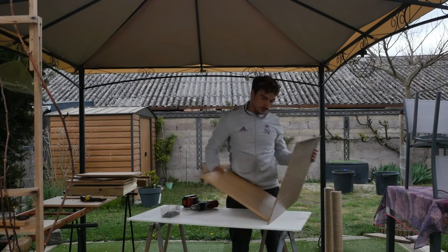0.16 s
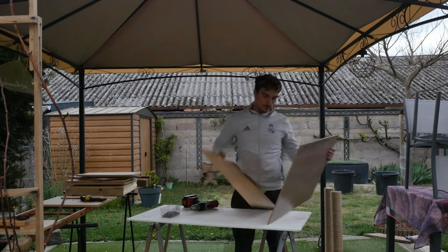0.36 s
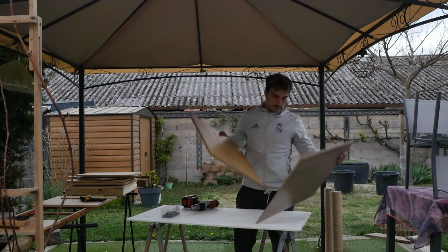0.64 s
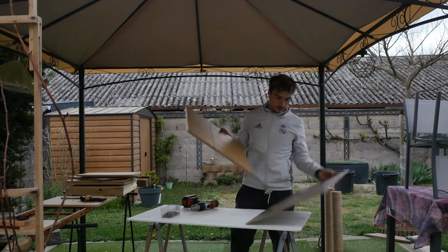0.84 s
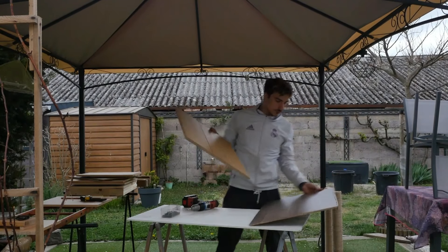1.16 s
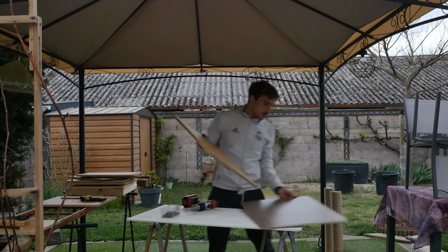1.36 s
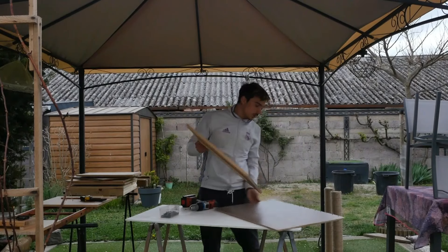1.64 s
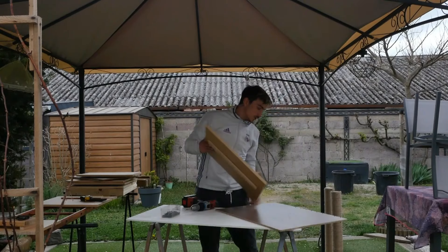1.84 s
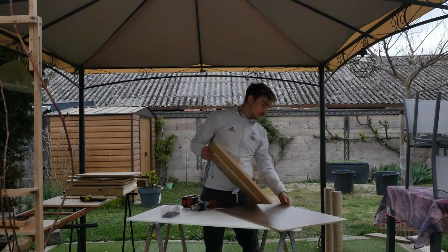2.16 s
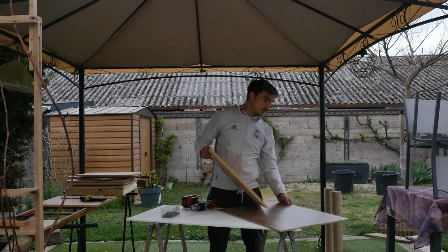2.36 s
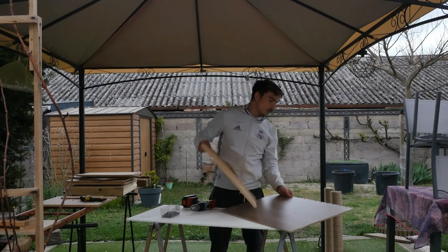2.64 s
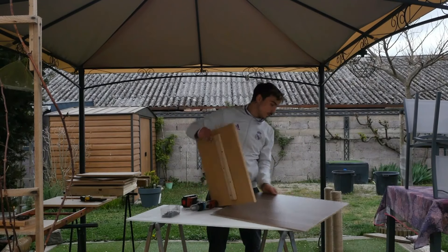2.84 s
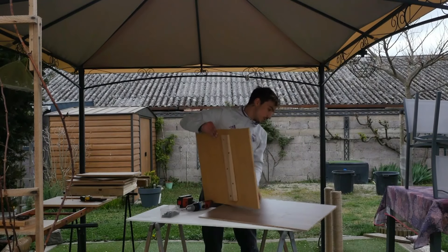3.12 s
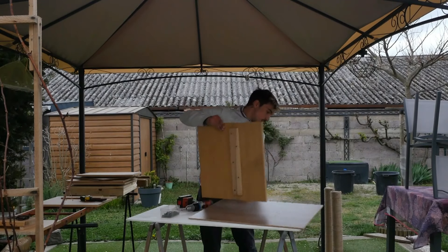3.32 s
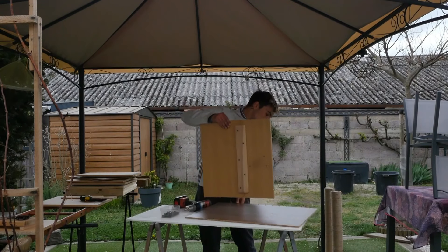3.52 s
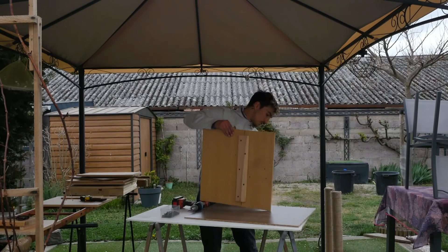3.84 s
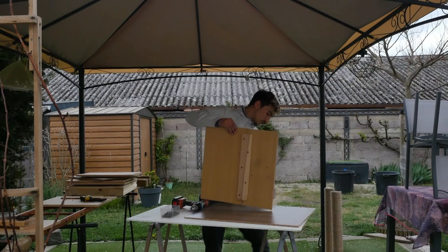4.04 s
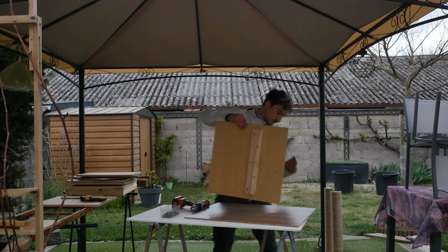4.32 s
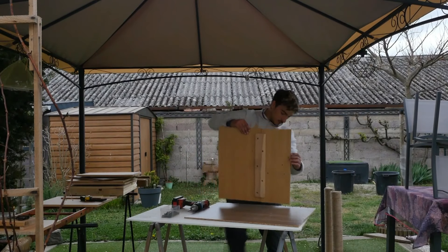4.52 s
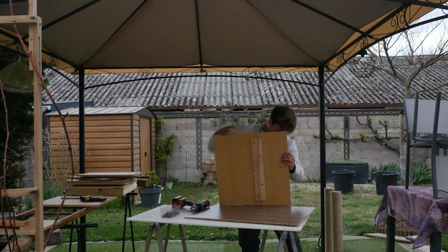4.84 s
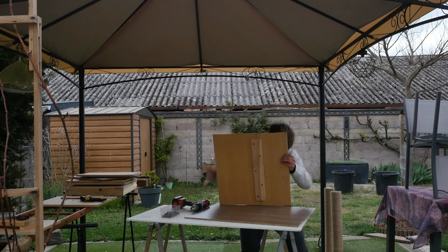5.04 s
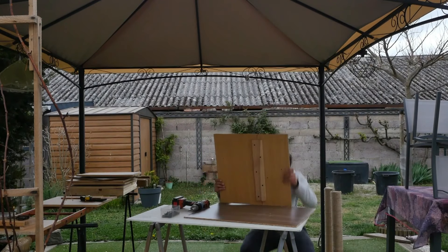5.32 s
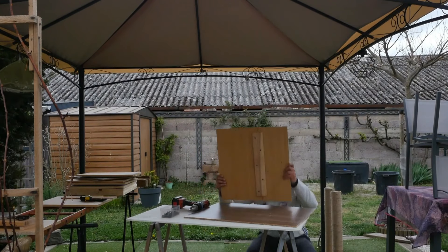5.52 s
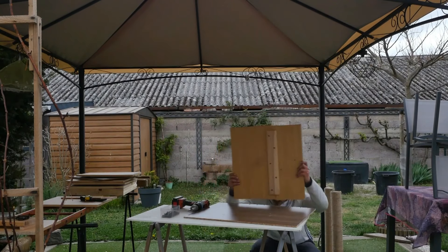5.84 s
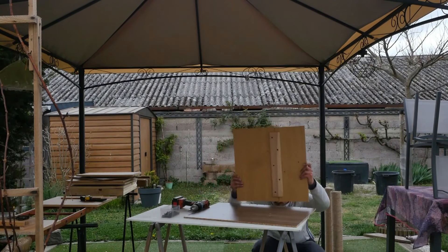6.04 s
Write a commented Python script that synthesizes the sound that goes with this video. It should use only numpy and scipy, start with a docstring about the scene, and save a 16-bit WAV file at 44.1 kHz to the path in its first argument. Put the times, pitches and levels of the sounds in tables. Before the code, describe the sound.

Dry snaps and coarse creaks open, followed by a woody rub and a brief lull. Rapid knocks and sliding follow, then light dragging, a rough scrape and a strong thud. Looser knocks and soft sleeve rustles trail off to a final ringing tick. Open yard with a thin echo, low gusts on the microphone, distant traffic and a barely audible bird.

```python
"""Wooden panels on a trestle table

Two wooden panels are pulled apart and handled on a table under a garden canopy: blows, cracks, strokes, sleeves.
Blows excite ringing wood modes, cracks are short filtered snaps, and friction is a stream of tiny slips.
Levelled low noise makes the wind on the microphone, steady noise the far traffic, gliding sines a faint bird."""
import sys
import numpy as np
from scipy import signal
from scipy.fft import rfft, irfft, next_fast_len
from scipy.io import wavfile
from scipy.ndimage import uniform_filter1d

SR = 44100
rng = np.random.default_rng(int(sys.argv[2]) if len(sys.argv) > 2 else 0)


def inscribe(sig):
    """Save sig as 16-bit PCM at rate SR to the path in sys.argv[1].

    A 1-D sig is mono; a 2-D sig holds one channel per row.
    Samples are clipped to [-1, 1] before scaling.
    """
    pcm = np.round(np.clip(np.atleast_2d(sig).T, -1, 1) * 32767)
    wavfile.write(sys.argv[1], SR, pcm.astype(np.int16))


N = 272538

# where body meets hard edge, and edge meets splinter fizz, in blows and strokes: [Hz]
BAND_EDGES_HZ = [1300, 7000]

# tone of a blow: (frequency [Hz], relative gain [dB])
KNOCK_COLOUR = [(100, -1), (180, 7.5), (270, 8.5), (500, 0.5), (820, 1), (1100, -5), (1400, -9.5),
                (2400, -13), (3500, -10.5), (4200, -18.5), (5500, -17), (7000, -39), (10000, -47.5),
                (16000, -47)]


def knock(body_db, hard_db, splinter_db, first, clatter_s, lowest_hz, contact_hz=2200, size=12000):
    """One blunt push, then the rest of the edge chatters down and the panel rings."""
    t = np.arange(size) / SR
    first = np.clip(first, 0, 1)
    age = t / max(clatter_s, .001)
    # the wood yields, so the push holds little treble
    push = tinted(signal.unit_impulse(size), lambda hz: -10 * np.log10(1 + (hz / contact_hz) ** 2))
    chatter = grains(size, per_s=1800, spread_db=3.5) * np.sqrt(age) * np.exp(-age)
    ring = unit(signal.fftconvolve(chatter, panel(modes_db=-10.5, dense_db=0.5))[:size])
    sound = np.sqrt(first) * push + np.sqrt(1 - first) * ring

    def blow_colour(hz):
        # a glancing blow leaves the lowest modes still
        low_cut_db = 10 * np.log10(1 + (lowest_hz / (hz + 1)) ** 4)
        return read(KNOCK_COLOUR, hz) - low_cut_db

    bands = split(tinted(sound, blow_colour), BAND_EDGES_HZ)
    attack = t < .03
    edge_db = body_db + hard_db
    fizz_db = edge_db + splinter_db
    levels_db = (body_db, edge_db, fizz_db)
    return sum(gain_of(db) * band / band[attack].std() for db, band in zip(levels_db, bands))


# a panel strikes the table; levels are for the first 30 ms, ahead of the overall knock trim:
# (time [s], body level [dB], hard edge above body [dB], splinter fizz above edge [dB],
#  energy share of the first push [0-1], clatter time [s], low-cut corner [Hz])
KNOCKS = [(.4, -31, -3.5, -28, 0.18, 0.012, 150), (1.412, -24.5, -8, -26, 0.05, .011, 564),
          (1.477, -24.5, 1.5, -36, 0.03, .005, 604), (1.487, -22, -9.5, -15, .05, 0.0079, 332),
          (1.573, -31.5, 3, -12, 0.36, 0.02, 600), (1.622, -22, -0.5, -27, 0, 0.011, 600),
          (1.631, -19.5, -11, -10.5, 0.35, 0.0044, 400), (1.757, -27.5, -7, -17, 0.2, .011, 180),
          (1.79, -24, -12, -23, 0.2, 0.0054, 180), (2.017, -25, -11, -32, 0.26, 0.0045, 380),
          (2.038, -30.5, -3, -25, 0, .006, 300), (2.146, -33, -5.5, -22, 0.02, .009, 220),
          (2.169, -28.5, -9.5, -18, 0.3, 0.016, 200), (2.8718, -13.5, -8, -14, 0.64, 0.0039, 365),
          (3.07, -21, -14.5, -23, .2, 0.0068, 323), (3.195, -26.5, 0, -31, 0.04, .018, 600),
          (3.223, -24, -11, -21, 0.43, .011, 330), (3.401, -32, -9, -22, 0.3, 0.0049, 260),
          (3.494, -28, -4, -27, .07, 0.0045, 398), (3.516, -27, -11.5, -22, 0.08, 0.0082, 250),
          (3.546, -30.5, -9, -17, 0.2, 0.0086, 219), (3.761, -23, -10.5, -16.5, 0.12, 0.0092, 248),
          (3.784, -28.5, -5.5, -19, .2, .0056, 180), (3.861, -21, -17.5, -25, 0.07, 0.0072, 297),
          (4.61, -24, -5, -11, .25, 0.0083, 200), (4.626, -19.5, -8.5, -12, 0, 0.0057, 200),
          (4.654, -20.5, -13, -20, 0.24, 0.0084, 450), (4.679, -24.5, -13, -27, 0.05, .008, 230),
          (4.734, -22, -18.5, -24, 0.4, 0.0041, 330), (4.957, -37.5, -9.5, -22, 0.25, .0056, 220),
          (5.0, -38.5, -13, -16, 0.05, 0.0042, 220), (5.287, -27.5, -11, -22, 0.17, 0.0046, 229),
          (5.303, -30.5, -18, -14, 0.02, 0.006, 250), (5.438, -31.5, -7.5, -16, 0.2, 0.0053, 160)]


def knocks(trim_db=-1):
    """Every blow of a panel on the table."""
    out = np.zeros(N)
    for s, *blow in KNOCKS:
        add(out, s, knock(*blow))
    return gain_of(trim_db) * out


# dry cracks and ticks of wood: (time [s], peak level ahead of the crack trim [dB],
#  centre [Hz], width [octaves], after-ring against the snap, before filtering [dB])
CRACKS = [(0.0471, -2, 2340, 0.75, -3.5), (.16, -12.5, 2920, 0.82, -2.5), (0.2106, -7, 2560, 0.55, -3),
          (0.2224, -18, 3580, 0.37, 9), (0.258, -18, 2680, 0.5, 5), (0.406, -14, 3980, 0.57, 19),
          (0.4368, -13, 3680, 0.55, 2.5), (1.478, -7.5, 3170, 0.3, -2.5), (1.5727, -11, 4180, 0.37, 10),
          (1.6225, -9, 3000, 0.24, -10), (1.7251, -17.5, 3700, 0.52, 2), (1.8147, -21.5, 2540, 0.92, 0),
          (1.855, -27, 3400, 0.85, 1), (2.874, -7, 5000, 0.65, -12), (2.974, -27, 3000, 1, -2),
          (3.406, -21, 3020, 0.75, 2), (3.4947, -17, 3600, 0.27, 0), (3.559, -29.5, 4000, .7, 0),
          (3.599, -25, 3200, 0.45, -8), (4.622, -7, 4730, 0.48, 0.5), (5.429, -19, 3350, 0.74, 1.5),
          (5.505, -23.5, 2940, 0.53, -6), (5.7476, -14.5, 1990, 0.69, 2.5), (5.797, -29, 3000, 0.53, -5)]


def cracks(trim_db=2, skirt_db=15, echo_s=0.001035, echo=0.1, size=6000):
    """Snaps a few cycles long, each with a close reflection and a short ring of the wood."""
    out = np.zeros(N)
    for s, db, centre_hz, octaves, ring_db in CRACKS:

        def snap_colour(hz):
            distance = np.log2((hz + 1) / centre_hz) / octaves
            return skirt_db * (1 - np.hypot(1, distance))

        snap = signal.unit_impulse(size) + echo * signal.unit_impulse(size, round(echo_s * SR))
        snap = snap + gain_of(ring_db) * dying(PANEL_T60, size)
        snap = tinted(snap, snap_colour)
        add(out, s, gain_of(db + trim_db) * snap / abs(snap).max())
    return out


TAP_S = 5.7475
# a small hard part rings: (frequency [Hz], starting level [dB], t60 [s])
TAP_MODES = [(1670, -22, 0.043), (1930, -28, 0.035), (2164, -26, 0.076), (2300, -32, 0.12),
             (2560, -35, 0.076)]


def tap(size=12000):
    """The last tap sets a small hard part ringing: brief, bright, decaying sines."""
    t = np.arange(size) / SR
    out = np.zeros(N)
    ring = sum(gain_of(db - 60 * t / t60) * np.sin(2 * np.pi * hz * t) for hz, db, t60 in TAP_MODES)
    add(out, TAP_S, ring)
    return out


# All stroke tables: (start [s], length [s], body level at mid-stroke [dB],
#  swell from start to end [dB], brightness lift of edge and fizz [dB])
# All stroke colours: (frequency [Hz], relative gain [dB])

# the joint gives: stroke columns, then colour columns
CREAKS = [(0.0, 0.074, -43, 10, 3.5), (.078, 0.092, -42.5, -12.5, 3.5), (.16, 0.11, -41.5, -1, -5),
          (.247, 0.087, -37, -9.5, 7), (.32, .085, -51.5, 1, -4)]
CREAK_COLOUR = [(100, -53), (170, -7.5), (532, -4), (808, 0), (1660, -11.5), (2260, 1), (2440, -19),
                (2840, -3), (14800, -48), (16000, -36)]


def creaks():
    """The joint creaks coarsely: sparse slips whose treble swells faster than the body."""
    return rub(CREAKS, CREAK_COLOUR, attack_s=0.0061, release_s=0.017, edge_db=-1.0, fizz_db=-25.5,
               treble_swell=2.3, per_s=1200, spread_db=3.0, modes_db=-28, dense_db=0.5, catch_db=2.5)


# one panel rubs off the other: stroke columns, then colour columns
PULLS = [(.445, 0.42, -28.5, 10.5, -0.5)]
PULL_COLOUR = [(82, -39), (140, -15), (204, -3), (254, -13.5), (292, 0), (518, -10), (801, -4.5),
               (977, -10), (1670, -13.5), (1810, -17.5), (3410, -15), (12400, -40), (16000, -42)]


def pulls():
    """Panel rubs off panel: near-equal slips excite strong main modes."""
    return rub(PULLS, PULL_COLOUR, attack_s=0.036, release_s=0.17, edge_db=-4.0, fizz_db=-30.5,
               treble_swell=0.38, per_s=1800, spread_db=1.0, modes_db=-11.5, dense_db=2.5, catch_db=0.5)


# a corner skims the table: stroke columns, then colour columns
GLIDES = [(.88, 0.23, -59.5, 2, 2.5), (1.075, 0.127, -43, 13, -5)]
GLIDE_COLOUR = [(290, -23), (500, -18), (919, -13), (1180, -18), (2610, -8), (3590, 2), (5240, -5),
                (6610, -23), (14700, -37), (16000, -41)]


def glides():
    """A corner skims the table: dense slips, with the edge band louder than the body."""
    return rub(GLIDES, GLIDE_COLOUR, attack_s=0.022, release_s=0.017, edge_db=6, fizz_db=-16,
               treble_swell=0.6, per_s=4000, spread_db=3, modes_db=-21, dense_db=1, catch_db=2.4)


# the panel slides flat and is nudged into place: stroke columns, then colour columns
SLIDES = [(1.188, .24, -31, -11, 0.5), (1.43, .16, -39.5, 2, 0), (1.655, .11, -39, -6, 3),
          (1.76, 0.13, -40.5, -4, -2.5)]
SLIDE_COLOUR = [(100, -48), (190, -21), (260, -9.5), (400, -13), (580, -5.5), (770, 0), (1100, -5),
                (1500, -11), (2500, -11), (3550, -4.5), (4300, -13), (5400, -18), (7000, -33), (10000, -48),
                (16000, -55)]


def slides():
    """A flat panel slides on wood: steady slips blurred by many small modes."""
    return rub(SLIDES, SLIDE_COLOUR, attack_s=0.017, release_s=0.038, edge_db=-1.0, fizz_db=-24.5,
               treble_swell=1.28, per_s=2000, spread_db=3.0, modes_db=-24, dense_db=3, catch_db=0.7)


# the other panel is shoved across it: stroke columns; the colour is shared with the drags
SHOVES = [(2.585, 0.099, -33, 16, -1.5), (2.645, 0.184, -25, 2, 1), (2.81, 0.074, -26.5, 7, 4.5)]
DRAG_COLOUR = [(110, -47), (190, -23), (229, -3), (406, -5.5), (472, -1.5), (658, -5), (919, -0.5),
               (1260, -10), (2120, -13.5), (3560, -10), (5260, -18), (6210, -29), (14300, -51),
               (16000, -59)]


def shoves():
    """The other panel is shoved across: sparse, fairly even slips."""
    return rub(SHOVES, DRAG_COLOUR, attack_s=0.037, release_s=0.025, edge_db=-1.0, fizz_db=-31.5,
               treble_swell=1.6, per_s=1100, spread_db=1.5, modes_db=-15.5, dense_db=-1.0, catch_db=0.6)


# the panel is lightly dragged and turned: stroke columns
DRAGS = [(2.19, 0.59, -46.5, 3, 4.5), (2.88, 0.11, -34, -1, -3.5), (2.965, .125, -31.5, -6.5, 1),
         (3.26, 0.24, -36.5, 3.5, 0), (3.545, 0.22, -39.5, -18, -1)]


def drags():
    """A light drag: uneven slips with a dense blur and little fizz."""
    return rub(DRAGS, DRAG_COLOUR, attack_s=0.022, release_s=0.033, edge_db=-5.5, fizz_db=-32,
               treble_swell=1.0, per_s=2000, spread_db=3.0, modes_db=-15.0, dense_db=3.5, catch_db=1.5)


# sleeves and palms brush the panel: stroke columns, then colour columns
BRUSHES = [(3.94, 0.16, -53.5, 7, 2.5), (4.2, 0.34, -50.5, 15, 1.5), (4.53, 0.102, -44.5, 14, 1.5),
           (4.765, 0.094, -44.5, -13, -2), (4.885, 0.096, -48, -3, 6.5), (5.08, .23, -43.5, 9, -0.5),
           (5.33, 0.067, -41, -14, 2.5)]
BRUSH_COLOUR = [(120, -37), (200, 2.5), (249, -3), (334, -6), (416, -1.5), (709, -13), (806, -2.5),
                (1590, -14.5), (3560, -12.5), (4270, -19.5), (5230, -16.5), (7270, -30), (14100, -38.5),
                (16000, -37.5)]


def brushes():
    """Cloth and skin hiss finely: dense slips that barely excite the wood."""
    return rub(BRUSHES, BRUSH_COLOUR, attack_s=0.02, release_s=0.037, edge_db=-1.0, fizz_db=-14,
               treble_swell=0.68, per_s=4000, spread_db=2.0, modes_db=-25, dense_db=-4.0, catch_db=1.5)


def rub(strokes, colour, attack_s, release_s, edge_db, fizz_db, per_s, spread_db, modes_db, dense_db, catch_db,
        treble_swell=1.0, catch_s=0.01, travel_hz=4):
    """Fibres catch and let go in clumps under a stroke that sets in, swells or sags, and lifts off."""
    out = np.zeros(N)
    for start, length, db, swell_db, bright_db in strokes:
        t = np.arange(0, length, 1 / SR)
        force = grains(len(t), per_s, spread_db) * gain_of(catch_db * wobble(len(t), catch_s))
        # the contact travels over the wood, so the small modes that it excites keep changing
        slips = np.zeros(len(t))
        for place in np.linspace(0, 1, 3, endpoint=False):
            spot = np.cos(np.pi * (travel_hz * t + place)) ** 2
            slips += signal.fftconvolve(force * spot, panel(modes_db, dense_db))[:len(t)]
        coloured = tinted(slips, lambda hz: read(colour, hz))
        body, edge, fizz = map(evened, split(coloured, BAND_EDGES_HZ))
        effort_db = swell_db * (t / length - .5)
        treble = gain_of(edge_db) * edge + gain_of(fizz_db) * fizz
        sound = gain_of(effort_db) * body + gain_of(bright_db + treble_swell * effort_db) * treble
        add(out, start, gain_of(db) * sound * ramp(t, attack_s) * ramp(length - t, release_s))
    return out


# what panel and table ring with: (frequency [Hz], relative level [dB], t60 [s])
MODES_WOOD = [(217.4, -9, 0.12), (251.2, -0.5, 0.13), (290, -4.5, .2), (378, -14, 0.11), (456, -3.5, 0.097),
              (514, -15, 0.048), (638, -6.5, 0.056), (775, 1.5, 0.041), (793, -13.5, 0.15),
              (837, -17, 0.047), (957, -7, 0.033), (1060, 4.5, 0.042), (1400, -38, .1), (1690, -21, .1),
              (1920, 1, 0.077), (2237, -3, .11), (2850, -21, 0.045), (3570, -1, 0.1), (3760, -3, 0.075)]
# decay of the many small panel modes: (frequency [Hz], t60 [s])
PANEL_T60 = [(200, 0.12), (600, 0.11), (1500, 0.13), (4000, 0.045), (12000, 0.048)]


def panel(modes_db, dense_db, size=12000):
    """The wood's answer to one contact: a direct push, its main modes and a blur of small ones."""
    t = np.arange(size) / SR
    modes = sum(gain_of(db - 60 * t / t60) * np.cos(2 * np.pi * hz * t) for hz, db, t60 in MODES_WOOD)
    blur = dying(PANEL_T60, size)
    return signal.unit_impulse(size) + gain_of(modes_db) * unit(modes) + gain_of(dense_db) * blur


# decay of the yard: (frequency [Hz], t60 [s])
YARD_T60 = [(200, 0.38), (1000, 0.44), (4000, 0.44), (12000, 0.51)]


def yard(x, delay_s=.012, size=18000):
    """Canopy and garden walls send back a thin, late tail."""
    out = np.zeros(N)
    add(out, delay_s, signal.fftconvolve(x, dying(YARD_T60, size)))
    return out


# the breeze on the microphone rises and drops: (time [s], rumble level [dB])
BREEZE = [(0.0, -39.5), (.33, -43), (.6, -28.5), (1.12, -40.5), (1.5, -24.5), (2.0, -27), (3.5, -24),
          (4.3, -28.5), (5.1, -43.5), (5.55, -41), (6.18, -26.5)]
# single gusts on top of it: (peak time [s], reach either side of the peak [s], peak rumble level [dB],
#  buffeting above the rumble [dB])
GUSTS = [(0.47, 0.18, -26.5, -12), (1.623, 0.3, -24.5, -8), (2.467, 0.08, -25, -12), (2.688, 0.23, -22, -5),
         (3.122, 0.17, -27.5, 2.5), (3.266, .14, -16, -3), (3.43, 0.15, -20.5, -1), (3.72, 0.23, -20.5, -6),
         (4.024, 0.23, -19.5, -5), (4.214, .14, -21.5, -1), (4.674, 0.31, -26.5, -8),
         (5.709, 0.12, -21, -5.5), (6.071, 0.078, -17, -10.5), (6.147, 0.069, -18.5, -0.5)]
# tone of the eddies within each wind band: (frequency [Hz], relative gain [dB])
WIND_COLOUR = [(8.8, -59), (15, -1), (38, 12.5), (80, -3.5), (203, -30), (258, -36.5), (320, -44.5),
               (343, -59), (419, -42), (450, -76), (580, -87), (990, -120)]
# buffeting above the rumble in a moderate breeze [dB], extra dB per dB, rumble of that breeze [dB]
BUFFET_DB, BUFFET_GROWTH, BREEZE_DB = -9, 0.25, -26


def wind(eddy_s=0.082, unrest_db=1.5, unrest_s=0.051):
    """Slow eddies push on the microphone; a faster flutter grows more steeply than the rumble."""
    t = np.arange(N) / SR
    breeze_db = np.interp(t, *np.transpose(BREEZE)) + unrest_db * wobble(N, unrest_s)
    buffet_db = breeze_db + BUFFET_DB + BUFFET_GROWTH * (breeze_db - BREEZE_DB)
    rumble_power = gain_of(breeze_db) ** 2
    buffet_power = gain_of(buffet_db) ** 2
    for peak_s, reach_s, db, above_db in GUSTS:
        gust = gain_of(db) * ramp(reach_s - abs(t - peak_s), reach_s) ** 2
        rumble_power = rumble_power + gust ** 2
        buffet_power = buffet_power + (gain_of(above_db) * gust) ** 2
    colour = gain_of(read(WIND_COLOUR, np.fft.rfftfreq(N, 1 / SR)))
    eddies = irfft(rfft(rng.standard_normal(N)) * colour, N)
    out = np.zeros(N)
    # rumble below 72 Hz, buffeting above; each is levelled, then follows its own power
    for power, band in zip((rumble_power, buffet_power), split(eddies, [72])):
        strength = np.sqrt(uniform_filter1d(abs(signal.hilbert(band)) ** 2 / 2, int(eddy_s * SR)))
        out += np.sqrt(power) * band / strength
    return out


# tone of far roads and air: (frequency [Hz], relative gain [dB])
AIR_COLOUR = [(59, -32), (100, -10), (189, -17.5), (224, -28.5), (283, -15), (343, -19.5), (513, -18),
              (784, -16.5), (930, -10), (1130, -20), (1280, -21), (3400, -32), (4110, -35.5), (5650, -37.5),
              (16000, -57.5)]


def traffic(level_db=-45.5):
    """The even wash of far roads and outdoor air: steady coloured noise."""
    air = tinted(rng.standard_normal(N), lambda hz: read(AIR_COLOUR, hz))
    return gain_of(level_db) * evened(air)


# a far bird: (start [s], length [s], starting pitch [Hz], glide [Hz per s], level before the fades [dB])
BIRD = [(1.952, 0.058, 2330, -900, -52), (2.089, 0.054, 2600, 6900, -50)]


def bird(waver=0.012, flutter_db=4):
    """Thin, broken, gliding whistles: sines unsteady in pitch and level."""
    out = np.zeros(N)
    for start, length, hz, glide, db in BIRD:
        t = np.arange(0, length, 1 / SR)
        pitch = (hz + glide * t) * (1 + waver * wobble(len(t), 0.0016))
        whistle = np.sin(2 * np.pi * np.cumsum(pitch) / SR)
        note = evened(whistle * gain_of(flutter_db * wobble(len(t), .006)))
        add(out, start, gain_of(db) * note * signal.windows.tukey(len(t), .3))
    return out


def gain_of(db):
    """Decibels to gain."""
    return 10 ** (np.asarray(db) / 20)


def evened(x):
    """Scales to rms 1."""
    return x / np.sqrt(np.mean(x ** 2) + 1e-20)


def unit(x):
    """Scales to energy 1."""
    return x / (np.linalg.norm(x) + 1e-12)


def read(points, hz):
    """Reads a table of (Hz, value) on a log-frequency axis."""
    f, value = np.transpose(points)
    return np.interp(np.log(hz + 1), np.log(f + 1), value)


def add(mix, s, sound):
    """Mixes a sound in at time s."""
    part = mix[max(round(s * SR), 0):][:len(sound)]
    part += sound[:len(part)]


def ramp(t, span_s):
    """A smooth rise from 0 to 1 over span_s."""
    return np.sin(np.pi / 2 * np.clip(t / max(span_s, .001), 0, 1)) ** 2


def wobble(size, span_s):
    """A smooth random control of rms 1."""
    width = max(int(span_s * SR), 2)
    smooth = uniform_filter1d(rng.standard_normal(size), width)
    return evened(uniform_filter1d(smooth, width))


def grains(size, per_s, spread_db):
    """Random tiny contacts, most weak and a few strong."""
    strength = gain_of(spread_db * np.minimum(rng.exponential(1, size), 4))
    return rng.choice([-1., 1.], size) * strength * (rng.random(size) < per_s / SR)


def dying(t60, size):
    """A wash of dense modes or echoes, each band dying at its own speed."""
    hz, t, z = signal.stft(rng.standard_normal(size), SR, nperseg=256)
    decay = gain_of(-60 * t / read(t60, hz)[:, None])
    return unit(signal.istft(z * decay, SR, nperseg=256)[1][:size])


def tinted(x, colour_db, size=4096):
    """Causal minimum-phase filter whose gain in dB is a function of frequency."""
    log_gain = np.log(gain_of(np.maximum(colour_db(abs(np.fft.fftfreq(size, 1 / SR))), -100)))
    taps = np.fft.ifft(np.exp(np.conj(signal.hilbert(log_gain)))).real
    return signal.fftconvolve(x, taps)[:len(x)]


def split(x, edges_hz, order=12):
    """Splits a sound into soft bands that sum to it."""
    size = next_fast_len(2 * len(x))
    hz, z = np.fft.rfftfreq(size, 1 / SR), rfft(x, size)
    below = [0 * hz] + [1 / (1 + (hz / edge) ** order) for edge in edges_hz] + [0 * hz + 1]
    return irfft(z * np.diff(below, axis=0), size)[:, :len(x)]


def scene():
    """Wood, cloth and wind in the yard, the same in both channels."""
    friction = creaks() + pulls() + glides() + slides() + shoves() + drags() + brushes()
    handling = knocks() + cracks() + tap() + friction
    mono = handling + gain_of(-12.5) * yard(handling) + wind() + traffic() + bird()
    mono = mono * signal.windows.tukey(N, .001)  # 3 ms fades
    return np.array([mono, mono])


def record(dry):
    """Clips at full scale, then cuts the treble above 15.9 kHz."""
    taps = signal.firwin(301, 15900, window=("kaiser", 9), fs=SR)
    return signal.oaconvolve(np.clip(dry, -1, 1), taps[None], "same")


dry = scene()
out = record(dry)
inscribe(out)
```